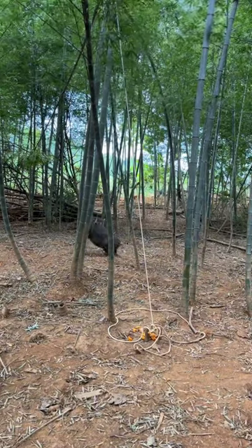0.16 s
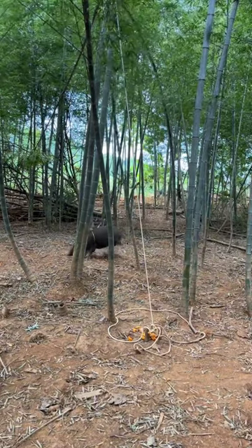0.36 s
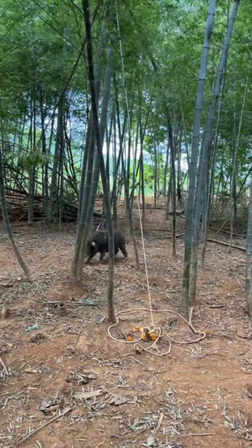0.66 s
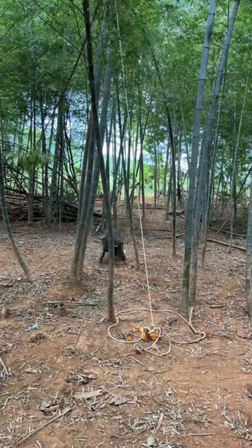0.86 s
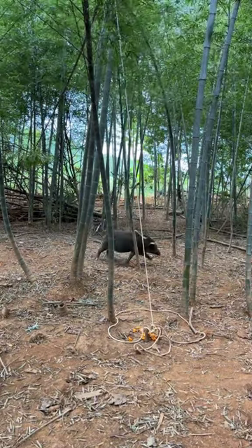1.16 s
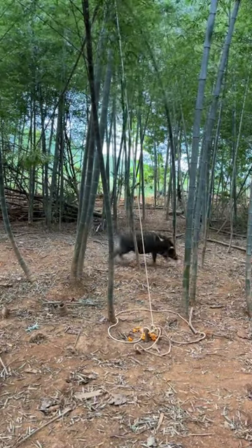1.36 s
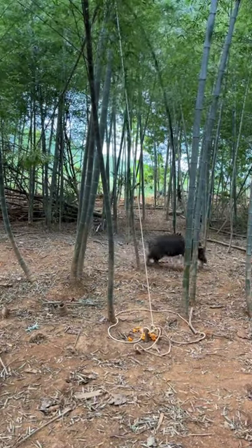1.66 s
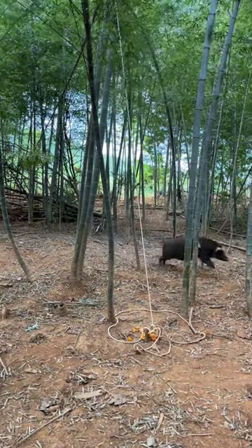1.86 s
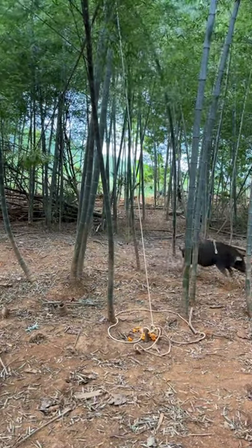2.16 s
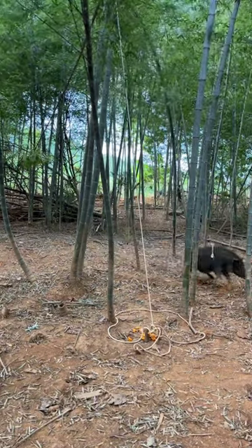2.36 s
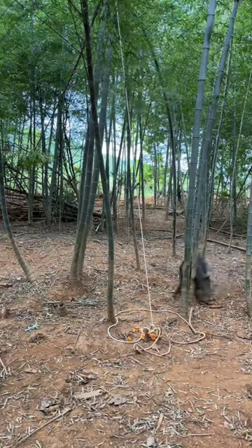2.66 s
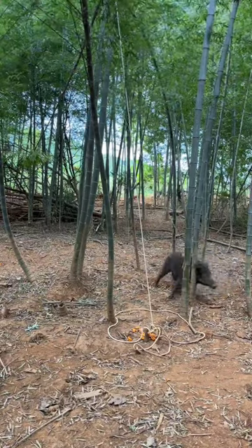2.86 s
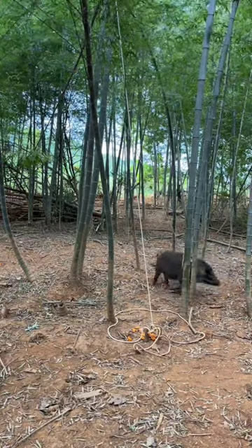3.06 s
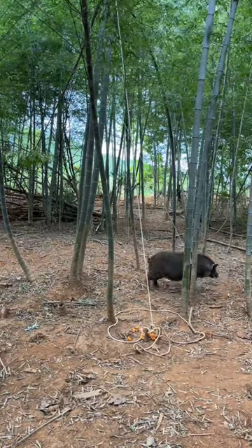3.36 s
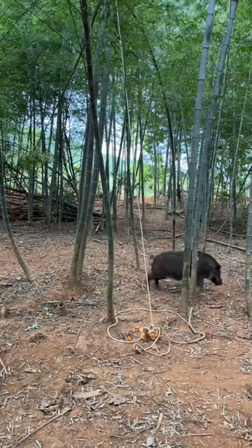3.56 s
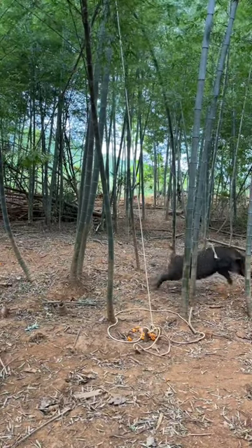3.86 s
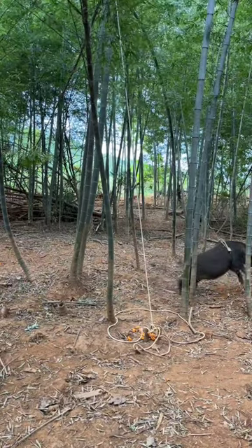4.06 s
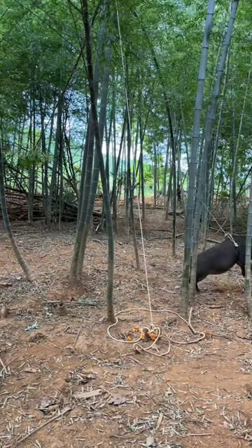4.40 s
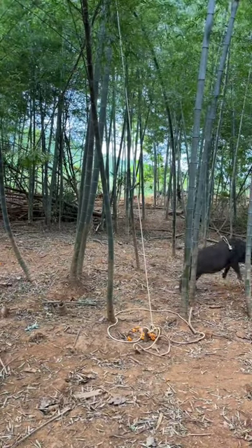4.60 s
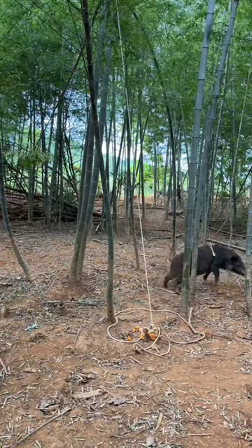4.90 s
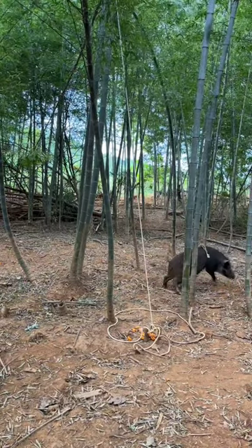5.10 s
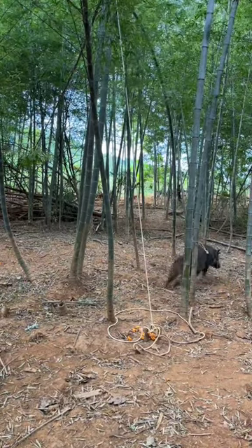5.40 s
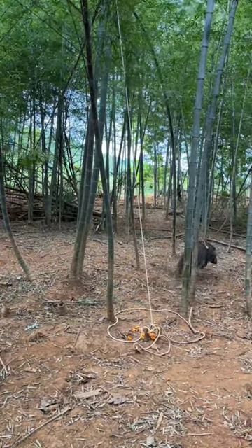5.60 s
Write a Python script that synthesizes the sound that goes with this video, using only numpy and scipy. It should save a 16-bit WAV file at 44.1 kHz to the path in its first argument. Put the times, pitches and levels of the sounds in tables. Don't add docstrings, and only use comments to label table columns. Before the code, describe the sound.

A boar is heard at a few metres in an open grove, on a small handheld stereo microphone. It starts at once with a harsh, breathy shriek, high and torn, ending near 0.45 s. A pause holds light low wind puffs and soft leaf and insect hiss, with a dull hoof thump about 0.5 s. Two short throaty grunts come at 0.9 and 1.03 s, the second softer. At 1.4 s a crackling low groan begins, breaks upward about 1.7 s and becomes a loud piercing squeal, growing hoarser until 2.8 s; small twig snaps fall at 1.5 and 2.6 s. After a short gap, a creaky, buzzing groan at 3.07 s rises by 3.6 s into a squeal, then from 4.4 s a rough, wavering scream that shakes and bursts again before breaking off around 5.7 s. Faint hoof thuds continue, and stems add brief diffuse echoes.

```python
import sys
import numpy as np
from scipy import signal
from scipy.fft import rfft, irfft, next_fast_len
from scipy.io import wavfile
from scipy.ndimage import uniform_filter1d, map_coordinates

SR = 44100
rng = np.random.default_rng(int(sys.argv[2]) if len(sys.argv) > 2 else 0)


def master(y):
    cut = np.clip(np.atleast_2d(y).T, -1, 1)
    pcm = np.round(cut * 32767)
    wavfile.write(sys.argv[1], SR, pcm.astype(np.int16))


def amplitude_ratio(level_db):
    exponent = np.asarray(level_db, float) / 20
    return 10 ** exponent


N = 253116
CLOCK = np.arange(N) / SR

# t/s, f/Hz, level/dB, strength of whistle plus fold tone/dB
WHISTLE_PHRASES = [
    [(0.0, 1632, -26, -22), (.09, 1714, -25.5, -16), (0.158, 1554, -37, -11), (0.222, 1833, -27, -31),
     (.29, 1720, -35, -15), (0.366, 1800, -48, -10), (0.38, 1640, -54, -8)],
    [(1.86, 1313, -55, 14), (1.89, 1299, -38, -3), (2.07, 1512, -37, 5), (2.13, 1697, -39, 5),
     (2.23, 1838, -35, -3), (2.392, 1836, -21.5, -9), (2.53, 1939, -26.5, -7), (2.674, 1890, -25.5, -12),
     (2.7, 1896, -24, 7.5)],
    [(3.84, 1250, -35.5, -7), (3.89, 1313, -25, -16), (4.03, 1308, -23.5, -23), (4.07, 1293, -39, -6),
     (4.124, 1388, -29, -2), (4.24, 1391, -35.5, 4)],
    [(4.25, 1602, -35.5, -4), (4.33, 1622, -35, 2.5), (4.422, 1605, -31, 2), (4.494, 1471, -22, -14),
     (4.51, 1443, -30.5, -14), (4.6, 1332, -29, -2), (4.736, 1227, -36.5, 4), (4.8, 1243, -35.5, 4.5)],
    [(4.82, 1635, -22, -9), (4.87, 1719, -34, -27), (4.94, 1701, -30, -12), (5.004, 1627, -31, -6),
     (5.06, 1644, -23, -6)],
    [(5.1, 1760, -33, -13), (5.17, 1880, -31, -13), (5.2, 1950, -29, -13), (5.26, 1740, -30, -13),
     (5.3, 1950, -33, -13), (5.4, 1950, -33, -16)],
    [(5.51, 1683, -42, -16), (5.57, 1617, -27, -8), (5.616, 1685, -26.5, -5), (5.65, 1818, -31, 5)],
]
# t/s, noise share/0-1, period doubling (every second puff weaker)/0-1
VOICE_QUALITY = [(.06, .42, .2), (.2, .6, .2), (.4, .9, .25), (1.4, .8, .6), (1.6, .36, .97),
                 (1.7, .45, .5), (1.95, .36, .3), (2.3, .6, .1), (2.55, .85, .1), (2.8, .95, .1),
                 (3.06, .7, .6), (3.13, .24, .8), (3.5, .28, .75), (3.6, .45, .7), (3.65, .35, .15),
                 (4.05, .42, .22), (4.3, .58, .4), (4.72, .35, .85), (5.1, .45, .65), (5.45, .6, .4),
                 (5.6, .95, .2)]


def unit(x):
    return x / np.sqrt(np.mean(x ** 2) + 1e-20)


def level(x):
    return x / np.sqrt(np.abs(uniform_filter1d(x ** 2, size=5000)) + 1e-12)


def along(points, hz):
    f, v = np.transpose(points)
    return np.interp(np.log(hz + 1), np.log(f + 1), v)


def curves(rows, at=CLOCK):
    s, *cols = np.transpose(rows)
    return [np.interp(at, s, c) for c in cols]


def sounding(tables, fade=0.015):
    inside = 0
    for t in tables:
        to_edge = np.minimum(CLOCK - t[0][0], t[-1][0] - CLOCK)
        inside = inside + np.clip(to_edge / fade + 1, 0, 1)
    return np.minimum(1, inside)


def wobble(rate):
    return map_coordinates(rng.standard_normal(int(N * rate / SR) + 4), [CLOCK * rate])


def sine(turns):
    return np.sin(2 * np.pi * turns)


def filtered(x, response):
    m = next_fast_len(N + SR // 2)
    return irfft(rfft(x, m) * response(np.fft.rfftfreq(m, 1 / SR)), m)[..., :N]


def resonance(f, hz, width_hz):
    return 1j * f * width_hz / (hz * hz - f * f + 1j * f * width_hz)


def rush(spectrum, channels):
    noise = rng.standard_normal((channels, N))
    return unit(filtered(noise, lambda hz: amplitude_ratio(along(spectrum, hz))))


def gusts():
    # t/s, level/dB, half width/s
    puffs = [(.1, -36.5, 0.025), (.32, -38.5, 0.063), (.54, -44, 0.032), (.98, -45, 0.14),
             (1.39, -42.5, 0.076), (2.05, -48.5, 0.17), (2.42, -48, 0.14), (2.72, -45, 0.029),
             (2.88, -43, 0.016), (3.52, -64, 0.29)]
    power = amplitude_ratio(-55 - 0.5 * CLOCK) ** 2
    for s, db, width in puffs:
        power = power + amplitude_ratio(db - 3.5 * ((CLOCK - s) / width) ** 2) ** 2
    return np.sqrt(power)


def grove():
    # f/Hz, level per Hz/dB
    leaf_colour = [(88, -47), (150, -2.5), (425, -7), (1400, -8.5), (2750, -6), (5100, -5.5), (9000, -10),
                   (15000, -9.5)]
    # t/s, level/dB
    rustle = [(0, -34), (.7, -45.5), (1.25, -51), (2.9, -50), (5.74, -46.5)]
    # f/Hz, level per Hz/dB
    rumble = [(21, -30), (35, -11.5), (81, -4), (117, -12), (161, -13.5), (300, -20.5), (390, -27),
              (660, -120)]
    duck_db = -4 * sounding(breaths(), fade=.05)
    leaves = amplitude_ratio(curves(rustle)[0] + duck_db + .9 * wobble(3)) * rush(leaf_colour, channels=2)
    shared, left, right = rush(rumble, channels=3)
    lumps = level(amplitude_ratio(0.58 * wobble(13)) * (shared + 0.61 * np.array([left, right])))
    return leaves + gusts() * lumps * amplitude_ratio([[.8], [-.8]])


def echoes(x):
    # f/Hz, time to fall 60 dB/s
    stems = [(200, 0.14), (600, 0.14), (2000, 0.42), (10000, 0.42)]
    hz, t, z = signal.stft(rng.standard_normal((2, SR // 2)), SR, nperseg=256)
    decay = amplitude_ratio(-60 * t / along(stems, hz)[:, None])
    tail = signal.istft(z * decay, SR, nperseg=256)[1]
    return signal.fftconvolve(x[None], tail / np.linalg.norm(tail[0]), axes=1)[:, :N]


def ground():
    # t/s, peak level/dB, f/Hz
    thumps = [(0.477, -52, 103), (0.537, -61, 98.6), (1.309, -50, 107), (2.144, -58, 384),
              (3.968, -53.5, 262.3), (3.355, -60, 134), (5.549, -56, 200), (5.718, -60.5, 200.1)]
    # t/s, peak level/dB
    snaps = [
        (1.5155, 1.5),
        (2.617, 0),
    ]
    out, t = np.zeros(N + SR), np.arange(SR // 8) / SR
    for s, db, hz in thumps:
        thud = amplitude_ratio(db + 28.0 - 60 * t / 0.043) * sine(hz * t) * (1 - np.exp(-t / 0.0019))
        out[round(s * SR):][:len(t)] += thud
    for s, db in snaps:
        ring = sine(1900 * t) + 0.43 * rng.standard_normal(len(t))
        out[round(s * SR):][:len(t)] += amplitude_ratio(db - 21.5 - 60 * t / 0.013) * ring
    return out[:N]


def breaths():
    # t/s, effort level/dB, mouth opening/0-1, air through the nose/dB
    shriek = [(0.0, -34.5, 0.98, 1.5), (.078, -34.5, 0.96, 5.5), (.136, -37.5, 0.89, 3),
              (.352, -28.5, 0.64, 0), (.382, -29, 0.27, -13)]
    grunt_rows = [
        (0.884, -33.5, 0.24, -15.5),
        (1.027, -37.5, 0.21, -10.5),
    ]
    groans = [
        [(1.388, -36.5, 0.28, -12.5), (1.42, -31.5, 0.36, -13.5), (1.548, -38.5, 0.14, 5),
         (1.604, -30, 0.46, -4), (1.665, -32, 0.33, -2), (1.675, -33.5, 0.46, -7), (1.69, -28.5, 0.38, 0.5)],
        [(3.07, -33, 0.33, -7), (3.09, -32.5, .2, -6), (3.11, -32.5, 0.091, -13), (3.18, -36.5, 0.092, -11.5),
         (3.24, -33.5, 0.15, -6.5), (3.3, -33.5, .17, -12), (3.6, -28.5, 0.33, -5.5)],
    ]
    squeals = [
        [(1.77, -27, 0.2, -8.5), (1.972, -25, 0.32, -9), (2.055, -32.5, 0.61, -3), (2.085, -23.5, 0.59, -5.5),
         (2.16, -26.5, 0.55, -7.5), (2.22, -23, .62, -12), (2.32, -28.5, 0.69, -9.5), (2.345, -23, 0.75, -14.5),
         (2.56, -23.5, 0.8, -3), (2.642, -23.5, 0.67, -11.5), (2.68, -28, 0.73, 4), (2.72, -29, 0.69, 3),
         (2.758, -32, 0.63, -2)],
        [(3.65, -43.5, 0.021, 16.5), (3.69, -43.5, 0.74, 15), (3.78, -30.5, 0.3, -4), (3.9, -28.5, 0.71, -5),
         (4.04, -26.5, 0.66, -4), (4.08, -29.5, 0.47, -6.5), (4.15, -31.5, 0.71, -5.5),
         (4.29, -35.5, 0.76, -4.5)],
    ]
    scream = [(4.41, -37.5, 0.94, 1.5), (4.77, -34, 0.76, -1.5), (5.01, -28, 0.72, -9),
              (5.12, -27.5, 0.62, -1.5), (5.51, -30.5, 0.62, 3.5), (5.618, -25, 0.66, 1),
              (5.66, -30.5, 0.58, -1)]
    attack_s, attack_db, release_s, release_db = .025, 25, .055, 23.5
    linger_s, linger_db = 0.11, -1.5

    def edge(row, s, db):
        return [(row[0] + s, row[1] - db, *row[2:])]

    grunts = [[g] + edge(g, 0.049, 4.2) for g in grunt_rows]
    whole = [shriek, *grunts, groans[0] + squeals[0], groans[1] + squeals[1] + scream]
    tables = []
    for b in whole:
        table = edge(b[0], -attack_s, attack_db) + b + edge(b[-1], release_s, release_db)
        if len(b) > 2:
            table = table + edge(b[-1], release_s + linger_s, release_db + linger_db)
        tables.append(table)
    return tables


def push(at=CLOCK):
    return curves(sum(breaths(), []), at)


def quality():
    noisy, doubling = curves(VOICE_QUALITY)
    shut = np.clip(1 - 3 * push()[1], 0, 1) * doubling
    start = 0
    for b in breaths()[1:]:
        start = start + (CLOCK > b[0][0]) * np.exp(-(np.abs(CLOCK - b[1][0]) / .1) ** 2)
    growl = np.clip(.4 * noisy ** 2 + .3 * shut + .6 * start + .05, 0, .9)
    blur = np.clip(1.5 * (noisy - .3), .14 + .15 * doubling, 1)
    return noisy, doubling, growl, blur


def throat(t):
    # t/s, tongue/0-1, palate/0-1, neck f/Hz
    tongue_moves = [(0, 0.3, 0.74, 940), (.17, 1, 0.76, 1070), (.4, 0.4, 0.56, 825), (.9, 0.97, 0.62, 866),
                    (1.04, 0.64, 0.86, 1200), (1.4, 0.82, 0.1, 920), (1.5, 0.9, 0.1, 796),
                    (1.68, 0.95, 0.65, 920), (1.9, 0.6, 1, 1190), (2.15, 0.35, 0.71, 1280),
                    (2.4, 1, 0.86, 814), (3.08, 0.49, 0.68, 884.8), (3.16, 0.88, 0.2, 860),
                    (3.28, 0.87, 0, 952), (3.38, 0.72, 0, 1088), (3.58, 0.7, 0.7, 1090),
                    (3.66, 0.8, 0.55, 930), (3.78, 0.86, 0.85, 1133), (3.95, 0.99, 0.43, 1260),
                    (4.38, 0.77, 0.82, 1155), (4.77, 0.09, 0.75, 1224), (5.0, 0.61, 0.64, 769.7),
                    (5.2, 0.79, 0.76, 1140), (5.4, 1, 0.56, 865), (5.6, 1.04, 0.77, 970)]
    # t/s, f/Hz
    chest_moves = [(.1, 696), (.25, 560), (.36, 600), (.9, 380.2), (1.05, 430), (1.42, 375.5), (1.5, 395),
                   (1.59, 323), (1.64, 348), (1.7, 468.4), (2.1, 528), (2.6, 666), (2.78, 624),
                   (3.08, 361.2), (3.45, 373), (3.9, 521.4), (4.45, 663), (4.7, 525.8), (5.05, 668),
                   (5.3, 622.5), (5.6, 639.9)]
    # t/s, f/Hz
    snout_moves = [(.05, 3600), (.25, 3100), (.35, 2690), (.9, 3220), (1.04, 3480), (1.46, 3580),
                   (1.56, 3235), (1.72, 3700), (2.03, 3286), (2.2, 3634), (2.46, 2820), (2.73, 3185),
                   (3.1, 3280), (3.66, 3480), (3.9, 3320), (4.28, 3735), (4.64, 3220), (5.2, 3260),
                   (5.45, 3020), (5.65, 3150)]
    high_hz = curves(sum(WHISTLE_PHRASES, []), t)[0]
    _, gape, nose_db = push(t)
    tongue, palate, neck_hz = curves(tongue_moves, t)
    rest_hz, palate_hz, sinus_hz = 1694, 2228, 4886
    mouth_hz = rest_hz + 0.65 * (high_hz - rest_hz)
    chest_hz, snout_hz = curves(chest_moves, t)[0], curves(snout_moves, t)[0]
    places = chest_hz, neck_hz, mouth_hz, palate_hz, snout_hz, sinus_hz
    return places, amplitude_ratio([-35 + 35 * tongue, -45 + 55 * palate, -9 + 9 * gape + 0.14 * nose_db])


def airflow():
    effort_db, gape, nose_db = push()
    mouth_db = effort_db - 20 + 35 * gape
    hiss_db = -41 + 1.106 * (effort_db + 35.5) + 1.19 * nose_db
    hiss_db += 27 * np.minimum(gape - .45, 0) * curves(VOICE_QUALITY)[1]
    return list(amplitude_ratio([effort_db, mouth_db, effort_db + nose_db, hiss_db]))


def breath(turns):
    # t/s, level/dB
    claps = [(.876, -6), (.891, 2), (0.904, 1.5), (0.916, 3), (0.936, 1), (1.021, 4), (1.037, 8),
             (1.049, 8.5), (1.063, -2), (1.09, 2), (1.384, -1), (1.395, 6), (1.408, 3), (1.417, 7.5),
             (1.455, 5.5), (1.674, 6), (3.068, -3), (3.088, 3.5), (3.108, 4)]
    noisy, doubling, growl, _ = quality()
    shaky = turns + .065 * noisy * wobble(300)
    beat = np.flatnonzero(np.diff(np.floor(shaky)) > 0)
    weak = np.floor(shaky[beat + 1]) % 2
    puffs = np.zeros(N)
    puffs[beat] = (1 - weak * doubling[beat]) * amplitude_ratio(3 * noisy[beat] * wobble(900)[beat])
    gate = 1 + 0.82 * np.cos(2 * np.pi * shaky) + 0.033 * doubling * np.cos(np.pi * shaky)
    flap = np.cumsum(78 * amplitude_ratio(2.3 * wobble(25))) / SR % 1
    flow = 1 - growl + growl * 2.4 * np.exp(-3 * flap)
    columns = np.transpose(claps)
    clap_s, clap_db = columns[:, np.searchsorted(columns[0], CLOCK) - 1]
    since = np.abs(CLOCK - clap_s)
    flow = np.where(since < .02, .3 + amplitude_ratio(clap_db) * np.exp(-since / .005), flow)
    cracks = (since <= 1 / SR) * amplitude_ratio(clap_db + 21.5)
    air = level(gate * rng.standard_normal(N))
    return cracks + flow * (np.sqrt(1 - noisy) * level(puffs) + np.sqrt(noisy) * air)


def rasp(turns, tonal):
    # t/s, f/Hz, depth/0-1
    nose_notch = [(0, 1150, 0.3), (.2, 990, 0.9), (.35, 1080, 0.1), (1.4, 2380, 0.1), (1.68, 2140, 0.2),
                  (1.8, 2780, 0.15), (2.3, 3080, 0.54), (3.1, 2500, 0), (3.2, 2360, 0.6), (3.45, 2496, 0.5),
                  (3.66, 2670, .93), (3.8, 2460, 0.08), (4.1, 2180, 0), (4.4, 2800, 0), (4.55, 2900, 0),
                  (4.6, 1010, .1), (4.75, 990, 0.7), (4.98, 1010, 0.97), (5.1, 1080, 0.7)]
    # t/s, f/Hz, level/dB
    cheek_pouch = [(0, 1330, -16), (.15, 1320, 8.5), (.3, 1390, -7), (1.42, 1360, -11), (1.62, 1240, 1),
                   (1.9, 1320, -7), (2.5, 1354, -36), (3.15, 1260, 4), (3.3, 1357, -26), (3.6, 1160, 1),
                   (3.75, 1203, 3), (4.3, 1287, -19), (4.75, 1253, -6), (5.0, 1198, -6), (5.15, 1300, -1),
                   (5.35, 1243, -8), (5.6, 1201, 8)]
    # f/Hz, level per Hz/dB
    hiss_colour = [(4800, -90), (5600, 11), (7300, 1), (9000, -1), (12000, -2.5), (15000, -12)]
    f, t, z = signal.stft(breath(turns), SR, nperseg=1024, noverlap=768)

    def patchwork(tall, wide):
        rows = uniform_filter1d(rng.standard_normal(z.shape), size=tall, axis=0)
        return unit(uniform_filter1d(rows, size=wide, axis=1))

    z = z * amplitude_ratio(2.2 * patchwork(7, 8) + 2.6 * patchwork(2, 12))
    places, (neck, palate, sinus) = throat(t)
    chest_hz, neck_hz, mouth_hz, palate_hz, snout_hz, sinus_hz = places
    f = f[:, None]
    noisy = curves(VOICE_QUALITY, t)[0]
    notch_hz, depth = curves(nose_notch, t)
    cheek_hz, cheek_db = curves(cheek_pouch, t)
    z = z * (1 - np.clip(depth, 0, .97) * np.abs(resonance(f, notch_hz, .34 * notch_hz)) ** 2)

    chest = resonance(f, chest_hz, width_hz=(0.69 + 0.44 * noisy ** 2) * chest_hz) ** 3
    chest = chest - neck * resonance(f, neck_hz, width_hz=150 + 330 * noisy ** 4) ** 2
    mouth = resonance(f, mouth_hz, width_hz=560) ** 3
    mouth = mouth - palate * resonance(f, palate_hz, width_hz=650) ** 3
    mouth = mouth + 1j * amplitude_ratio(cheek_db) * resonance(f, cheek_hz, width_hz=240) ** 2
    snout = np.abs(resonance(f, snout_hz, width_hz=500 + 700 * noisy)) ** 3
    snout = snout + sinus * np.abs(resonance(f, sinus_hz, width_hz=2100)) ** 4
    eddies = 1 + 1.8 * np.exp(2j * np.pi * rng.random(z.shape))
    hiss = amplitude_ratio(along(hiss_colour, f)) * eddies

    bands = []
    for shape in (chest, mouth, snout, hiss):
        band = signal.istft(z * shape, SR, nperseg=1024, noverlap=768)[1][:N]
        bands.append(level(band))
    gains = airflow()
    gains[2:] = [g * amplitude_ratio(1.9 * wobble(16)) for g in gains[2:]]
    for k, tone in enumerate(tonal):
        used = np.abs(uniform_filter1d(tone ** 2, size=3000))
        gains[k] = np.sqrt(np.maximum(gains[k] ** 2 - used, 0.07 * gains[k] ** 2))
    return sounding(breaths()) * sum(g * b for g, b in zip(gains, bands))


def strays():
    # t/s, f/Hz, level/dB
    brief_tones = [
        [(0, 2264, -42), (.08, 2102, -31), (.13, 1900, -29)],
        [(1.03, 470.6, -38), (1.04, 475, -44), (1.075, 607, -45)],
        [(1.48, 218, -44.5), (1.58, 234.2, -33), (1.602, 250.9, -34), (1.622, 305.4, -42), (1.65, 312.4, -38)],
        [(1.67, 986.8, -33), (1.704, 1092, -28), (1.716, 1000, -50), (1.8, 1049, -51)],
        [(2.24, 2396, -37), (2.274, 2470, -29), (2.34, 2546, -18)],
        [(3.67, 2300, -41), (3.7, 2320, -46)],
        [(3.72, 1877, -38), (3.8, 1944, -47), (3.85, 2000, -32.5)],
        [(3.87, 1535, -42), (3.97, 1615, -27), (4.044, 1659, -42), (4.05, 1532, -46)],
        [(4.27, 628.6, -54), (4.34, 670, -45), (4.46, 660, -43), (4.56, 650, -42)],
        [(4.63, 2633, -41), (4.648, 2620, -33), (4.724, 2456, -32), (4.78, 2501, -28.5)],
        [(4.81, 1987, -27), (4.818, 2007, -33), (4.936, 1909, -27), (4.96, 1870, -26)],
        [(5.03, 1896, -32), (5.07, 1955, -24)],
        [(5.11, 1270, -33), (5.16, 1328, -40), (5.24, 1285, -37)],
        [(5.32, 1378, -39), (5.358, 1418, -29.5), (5.42, 1430, -36)],
        [(5.46, 2020, -42), (5.484, 2017, -27), (5.53, 1958, -31)],
        [(5.555, 196, -47), (5.59, 129, -46), (5.625, 100, -40)],
    ]
    pitch_hz, tone_db = curves(sum(brief_tones, []))
    turns = np.cumsum(pitch_hz * (1 + .012 * wobble(60))) / SR
    loudness = amplitude_ratio(tone_db - 3 + 2.5 * wobble(50)) * sounding(brief_tones, fade=0.017)
    return np.sqrt(2) * loudness * sine(turns)


def whistle(turns):
    # multiple, level/dB
    side_tones = [(-1, -27), (.5, -14), (-.5, -17), (1.5, -19), (2, -24)]
    pitch_hz, tone_db, upper_db = curves(sum(WHISTLE_PHRASES, []))
    blur = quality()[3]
    shake = blur * (0.03147 * wobble(45) + 0.0495 * wobble(250))
    high = np.cumsum(pitch_hz * (1 + shake)) / SR
    wave = sine(high) + amplitude_ratio(-25 + 3 * wobble(5)) * sine(2 * high)
    wave += amplitude_ratio(upper_db + 2.5 * wobble(30)) * sine(high + turns)
    for k, db in side_tones:
        wave += amplitude_ratio(db + 3 * wobble(9)) * sine(high + k * turns)
    loudness = amplitude_ratio(tone_db + (1.0 + 1.6 * blur) * wobble(70))
    return np.sqrt(2) * loudness * sounding(WHISTLE_PHRASES, fade=1 / 100) * wave


def folds():
    # t/s, f/Hz, level/dB
    registers = [
        [(0.0, 576, -46), (0.144, 531.2, -40.5), (0.262, 513.2, -30.5), (0.4, 610.7, -40)],
        [(.95, 403.3, -80)],
        [(1.39, 380.2, -38.5), (1.418, 360.3, -30), (1.445, 355, -35.5), (1.5, 435, -52), (1.58, 463.3, -63),
         (1.66, 494.2, -60)],
        [(1.7, 504.5, -36), (1.74, 513.2, -27), (1.888, 525.7, -27), (1.992, 560.8, -19.5), (2.1, 581.5, -27.5),
         (2.298, 628.5, -24), (2.384, 655, -24.5), (2.48, 631, -25), (2.532, 668.4, -27), (2.692, 644, -33.5),
         (2.75, 675.7, -54)],
        [(3.07, 383, -49), (3.112, 329.6, -33), (3.14, 372.4, -48), (3.262, 346.9, -43), (3.335, 415.5, -32),
         (3.36, 389, -44), (3.408, 406.5, -30.5), (3.446, 387.6, -67), (3.49, 396.3, -24.5), (3.53, 378, -34),
         (3.558, 447, -25.5)],
        [(3.58, 443.3, -25.5), (3.63, 451.3, -26), (3.67, 454, -21), (3.8, 490.6, -25), (3.89, 509, -21),
         (4.14, 535, -33), (4.23, 546.6, -34.5), (4.29, 554, -41.5)],
        [(4.35, 557.4, -40.5), (4.5, 524.6, -44), (4.56, 510.5, -36.5), (4.64, 502.6, -37.5), (4.91, 491, -33),
         (5.2, 523.2, -29), (5.56, 551, -37)],
    ]
    # multiple, level/dB
    overtones = [(4, -36), (6, -40), (7, -27), (8, -29), (9, -31)]
    pitch_hz, tone_db = curves(sum(registers, []))
    noisy, doubling, growl, _ = quality()
    effort_db, gape, _ = push()
    doubled_db = effort_db + 27 * doubling
    half_db = doubled_db - 31 - 26 * gape
    octave_db = -40.5 + 0.82 * (tone_db + 18.5) - 17 * doubling
    waver = .004 * wobble(60) + growl * .04 * wobble(22) + noisy ** 4 * .2 * wobble(150)
    turns = np.cumsum(pitch_hz * (1 + waver)) / SR
    wave = sine(turns)
    for k, db in overtones:
        wave += amplitude_ratio(db + 5 - 22 * doubling + 6 * wobble(12)) * sine(k * turns)
    wave = amplitude_ratio(tone_db + (0.3 + 6 * growl) * wobble(50)) * wave
    wave += amplitude_ratio(half_db + 5 * wobble(40)) * sine(turns / 2)
    wave += amplitude_ratio(octave_db + 2.5 * wobble(40)) * sine(2 * turns)
    wave += amplitude_ratio(doubled_db - 34.5 + 2.4 * wobble(30)) * gape * sine(1.5 * turns)
    return turns, np.sqrt(2) * sounding(registers) * wave


def scene():
    # f/Hz, likeness/0-1
    likeness = [(100, 1), (300, 0.89), (600, 0.65), (2100, 0.74), (2600, 0.6), (4600, 0.26), (5200, 0.97)]
    # f/Hz, level/dB
    tilt = [(100, -2), (300, -0.5), (600, -2), (1000, -0.5), (2000, -2), (3200, -4.5), (4000, -15),
            (4800, -8), (5600, -2.5)]
    # f/Hz, phase/rad
    lead = [(60, 0.58), (350, -0.66), (650, -0.9), (1000, -0.99), (1350, -0.87), (2200, 0.81), (5000, 2.07)]
    turns, tone = folds()
    high = whistle(turns)
    boar = tone + high + strays() + rasp(turns, (tone, high)) + ground()
    side = np.array([[.5], [-.5]])

    def alike(hz):
        return np.clip(np.abs(along(likeness, hz)), .05, .98)

    def ports(hz):
        return np.sqrt(alike(hz)) * amplitude_ratio(side * along(tilt, hz)) * np.exp(1j * side * along(lead, hz))

    direct = filtered(boar, ports)
    scatter = filtered(echoes(boar), lambda hz: amplitude_ratio(-3.5) * np.sqrt(1 - alike(hz)))
    return amplitude_ratio(1.5) * (direct + scatter) + grove()


def band_limit(x):
    return signal.sosfilt(signal.butter(12, 15480, fs=SR, output="sos"), x)


def record(dry):
    port_gap_s, port_turn = 1 / 4330, .125

    def treble(hz):
        return np.clip((hz - 4900) / 500 + .5, 0, 1) * (hz < 15500)

    def turn(hz):
        return np.pi * (hz * port_gap_s + port_turn)

    def strong(g, hz):
        return g * ((np.abs(g) > .4) | (hz < 7000))

    def late(hz):
        total = strong(np.cos(turn(hz)), hz) * (hz < 13900)
        return total + 1j * np.array([[1], [-1]]) * strong(np.sin(turn(hz)), hz)

    pair = filtered(dry, lambda hz: amplitude_ratio(np.minimum(0, (4650 - hz) / 60)))
    pair += filtered(dry[0], lambda hz: np.sqrt(treble(hz)) * late(hz))
    pair = pair / (1 + np.abs(pair / .8) ** 4) ** .25
    return band_limit(pair)


dry = scene()
out = record(dry)
master(out)
```